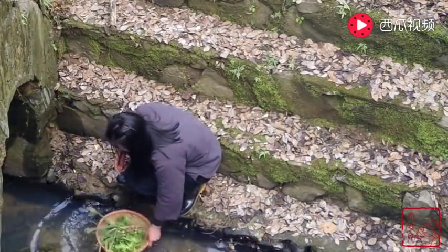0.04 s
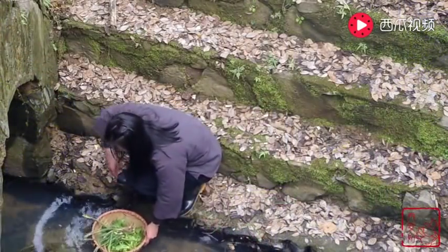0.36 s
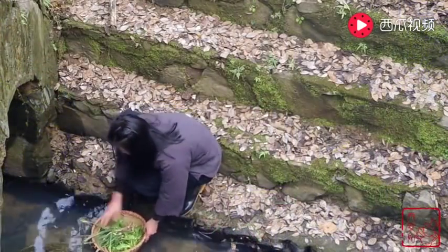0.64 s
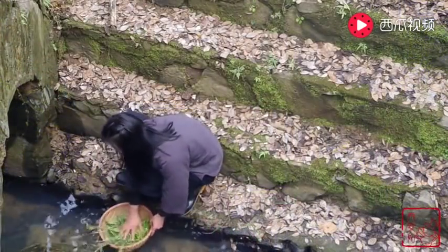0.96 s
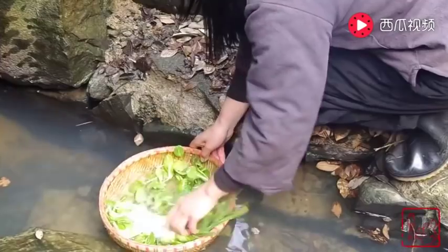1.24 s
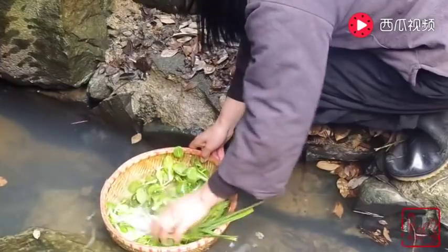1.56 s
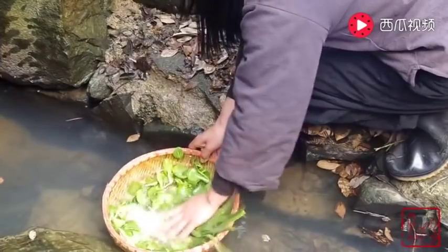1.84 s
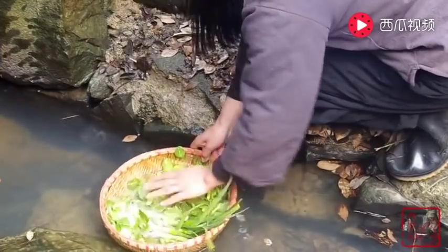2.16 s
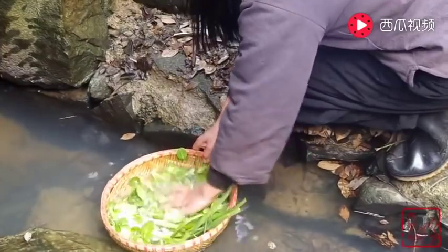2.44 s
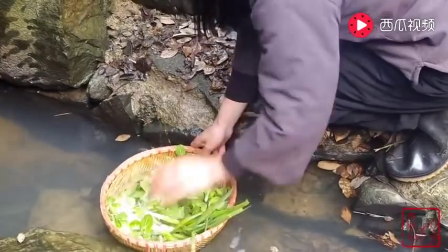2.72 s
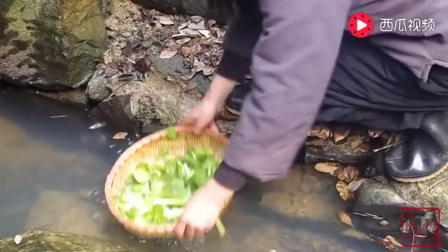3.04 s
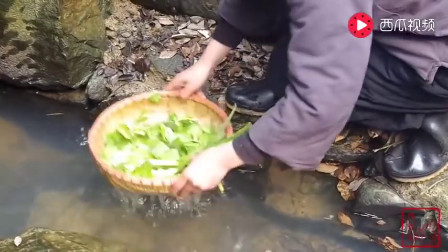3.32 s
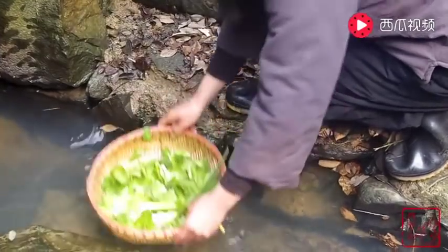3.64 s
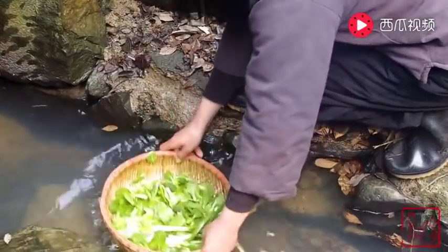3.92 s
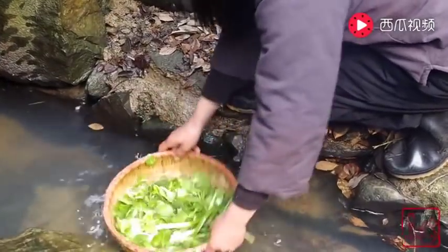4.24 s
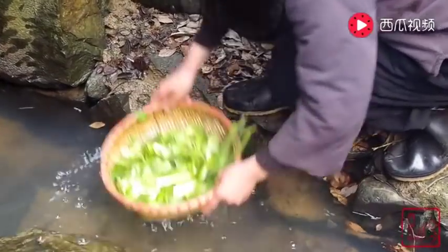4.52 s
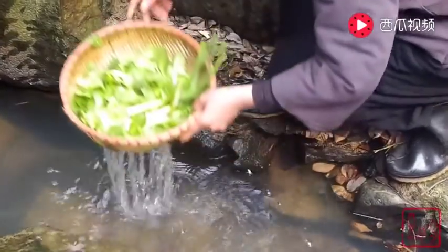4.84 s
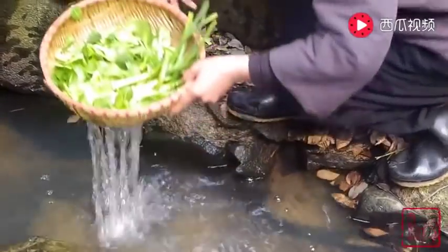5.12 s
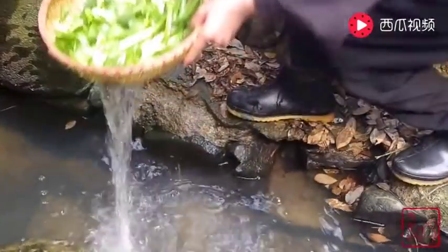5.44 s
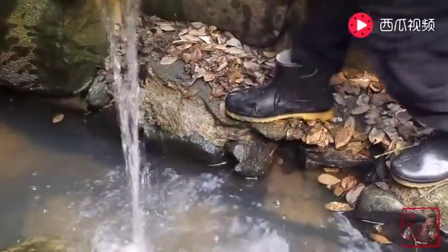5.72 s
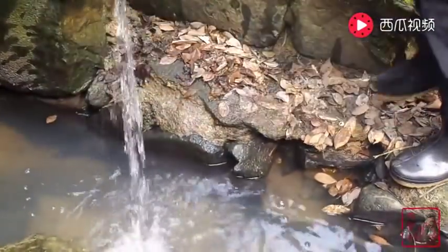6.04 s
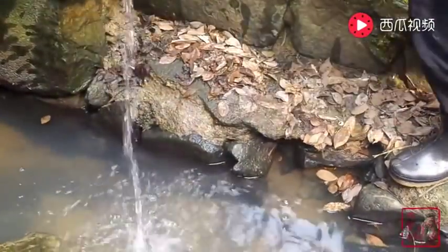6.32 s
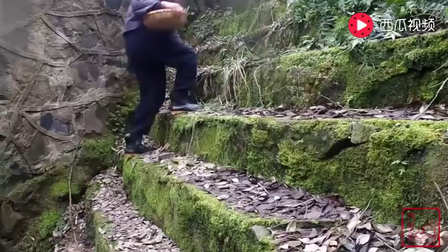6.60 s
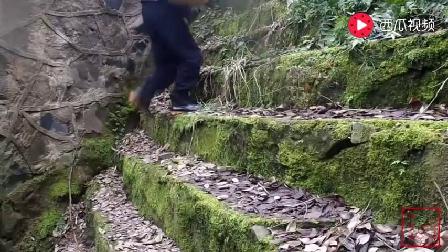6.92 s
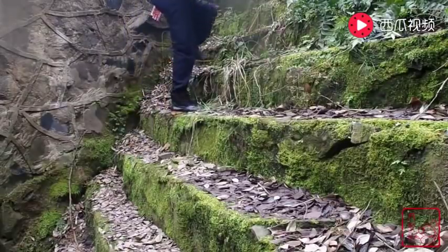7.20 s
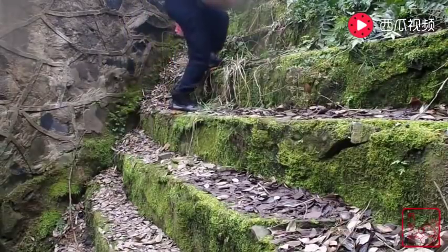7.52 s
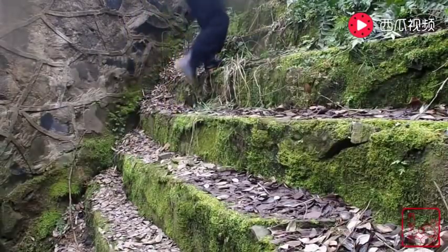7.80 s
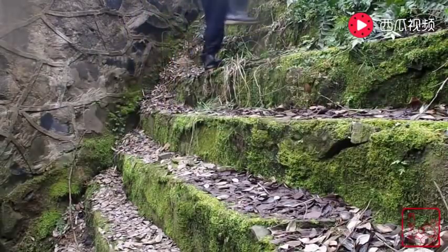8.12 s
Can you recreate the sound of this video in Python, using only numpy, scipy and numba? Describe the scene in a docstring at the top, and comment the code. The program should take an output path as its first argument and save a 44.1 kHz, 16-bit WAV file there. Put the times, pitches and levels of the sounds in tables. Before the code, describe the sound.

Greens are swished in a shallow stream and water pours from the lifted basket, followed by a few footsteps on leafy stone steps.

```python
"""In a shallow stream between stone walls, greens are swished in a basket that is dunked, lifted
and left to drain. Trapped air bubbles ring under a crackle of spray, with slaps, gurgles and drips.
We listen first from the bank, over a dull rumble, then close by, where the stream murmurs.
Then the scene jumps to boots thudding up stone steps, crushing dry leaves and cracking twigs.
The walls add a short echo, and a low hum runs throughout."""
import sys
import numpy as np
from scipy import signal
from scipy.io import wavfile
from scipy.ndimage import uniform_filter1d
from numba import njit

SR = 44100
rng = np.random.default_rng(int(sys.argv[2]) if len(sys.argv) > 2 else 0)


def unload_audio(sound):
    """Save the sound as a 16-bit wav file, at the path given as the first command line argument."""
    columns = np.transpose(np.atleast_2d(sound))
    # keep every value between -1 and 1, then stretch to whole-number steps
    steps = np.round(np.clip(columns, -1, 1) * 32767)
    wavfile.write(sys.argv[1], SR, steps.astype(np.int16))


N = 368676
T = np.arange(N) / SR
SLOW_T = T[::64]  # a coarser clock for slow changes
CLOSE_S, STEPS_S = 1.092, 6.595  # the listening place jumps to the water's edge, then the scene changes to the steps

# tone colour of spray: (frequency [Hz], level [dB])
SPRAY_COLOUR = [(150, -37.5), (500, -6), (1300, -7), (3200, -3.5), (6000, 1), (7500, 5), (8300, 1.5),
                (9300, 5), (9800, 0.5), (13500, 1), (16000, -11.5)]
# water pours through the lifted basket's mesh:
# (full flow from [s], until [s], relative bubbling [dB], relative spray [dB], deepest pitch [Hz])
POURS = [(3.596, 3.765, -26.5, -26, 330), (4.909, 6.6, -25.5, -27, 165.4)]


def amp(db):
    """Turns decibels into a gain."""
    return 10 ** (np.asarray(db) / 20)


def evened(x):
    """Scales a sound to an average level of 1."""
    return x / np.sqrt(np.mean(x ** 2) + 1e-20)


def steadied(x, span_s):
    """Holds the level near 1 over each span; quicker flicker is kept."""
    size = max(int(span_s * SR), 64)
    power = uniform_filter1d(uniform_filter1d(x ** 2, size), size)
    return x / np.sqrt(abs(power) + 1e-12)


def level_at(colour, hz):
    """Looks up a tone colour's level in dB at any frequency."""
    known_hz, db = np.transpose(colour)
    return np.interp(np.log(hz + 1), np.log(known_hz + 1), db)


def add(mix, start_s, sound):
    """Mixes a sound in at the given time."""
    part = mix[max(round(start_s * SR), 0):][:len(sound)]
    part += sound[:len(part)]


def coloured(x, colour, tilt_db=0):
    """Gives a sound a tone colour, tilted by tilt_db per octave above 500 Hz."""
    hz = abs(np.fft.fftfreq(4096, 1 / SR))
    log_gain = np.log(amp(level_at(colour, hz) + tilt_db * np.log2(np.maximum(hz, 500) / 500)))
    taps = np.fft.ifft(np.exp(signal.hilbert(log_gain).conj())).real  # keeps the front of a click sharp
    return signal.oaconvolve(x, taps[:len(hz) // 2])[:len(x)]


def noise(size, hz, kind="low"):
    """Noise below one frequency, or in a band between two."""
    return signal.sosfilt(signal.butter(2, hz, kind, fs=SR, output="sos"), rng.standard_normal(size))


def crackle(size, per_s, spread_db):
    """Random clicks, most of them small and a few large."""
    strength = rng.standard_normal(size) * amp(spread_db * np.minimum(rng.exponential(1, size), 4))
    return strength * (rng.random(size) < per_s / SR)


def burst(t, rise, fade):
    """Swells to 1 over the rise time, then dies away."""
    return np.minimum(t / rise, 1) * np.exp(-np.maximum(t - rise, 0) / fade)


def plateau(start, end, rise_db_per_s, fall_db_per_s):
    """A level in dB that climbs to 0 at the start, holds to the end, and falls."""
    return -rise_db_per_s * np.maximum(start - SLOW_T, 0) - fall_db_per_s * np.maximum(SLOW_T - end, 0)


@njit
def ring(starts, height, hz, cycles, climb):
    """Tones that fade to about a third in `cycles` swings; climb lifts the pitch, as in a rising bubble."""
    out = np.zeros(N)
    for k in range(len(starts)):
        start = max(int(starts[k] * SR), 0)
        for i in range(min(int(5 * cycles[k] * SR / hz[k]), N - start)):
            turns = i * hz[k] / SR
            age = turns / cycles[k]
            level = height[k] * np.exp(-age) * (1 - np.exp(-turns ** 2 / 2))
            out[start + i] += level * np.sin(2 * np.pi * turns * (1 + climb * age))
    return out


def background(hum_hz=60):
    """A dull rumble on the bank, then the stream's murmur, with a wavering hum under both."""
    # tone colours of the rumble and the stream: (frequency [Hz], level [dB])
    rumble_colour = [(25, -11), (55, 6.5), (110, -1), (270, -1), (360, -17.5), (1200, -18.5), (3500, -28.5),
                     (16000, -32.5)]
    stream_colour = [(20, 23.5), (58, 28), (110, 14.5), (550, 9.5), (700, 12.5), (1000, 8), (3500, 3.5),
                     (12000, 3), (16000, -1.5)]
    murmur = amp(-45) * evened(coloured(rng.standard_normal(N), stream_colour))
    rumble = amp(-38) * evened(coloured(rng.standard_normal(N), rumble_colour))
    waver = 0.63 * evened(noise(N, 7))
    hum = evened(np.sin(2 * np.pi * hum_hz * T + waver)) * amp(np.where(T < STEPS_S, -64, -54))
    return np.where(T < CLOSE_S, rumble, murmur) + hum


def far_swish():
    """A hand swishes in the water, heard from the bank as a soft wash."""
    # how the swishing swells and sinks: (time [s], level [dB])
    swells = [(0, -41), (.25, -46), (.3, -38.5), (.45, -48.5), (.9, -55.5), (1.09, -46)]
    # its tone colour: (frequency [Hz], level [dB])
    swish_colour = [(300, -5), (1400, -3), (3000, -10.5), (7000, -11.5), (11000, -23)]
    level = amp(np.interp(T, *np.transpose(swells))) * (T < CLOSE_S)
    return level * evened(coloured(rng.standard_normal(N), swish_colour))


def walls(x, echo_db, ring_s=0.21, treble_ring_s=0.079, patterns=5):
    """Stone walls scatter a short echo whose treble dies first; it shifts as the source moves about."""
    t, out = T[:SR // 2], x
    for k in range(patterns):
        bounces = rng.standard_normal(len(t)) * (rng.random(len(t)) < 3000 / SR) * (t > .004)
        low = signal.sosfilt(signal.butter(1, 4000, fs=SR, output="sos"), bounces)
        tail = low * amp(-60 * t / ring_s) + (bounces - low) * amp(-60 * t / treble_ring_s)
        share = np.sin(np.pi / 2 * np.minimum((T / .06 - k) % patterns, 2))  # the patterns take turns
        out = out + amp(echo_db) * signal.oaconvolve(x * share, tail / np.linalg.norm(tail))[:N]
    return out


def slaps():
    """A hand, the basket or a falling clump of water slaps the surface."""
    # hits on the water: (time [s], level [dB], fading time [s])
    hits = [(0.025, -31.5, 0.0026), (0.373, -36.5, .012), (1.085, -32, 0.0071), (1.332, -37.5, 0.033),
            (2.28, -28, 0.034), (2.982, -33.5, 0.015), (4.304, -31, 0.009), (4.734, -24, 0.007),
            (4.926, -18.5, 0.013), (5.240, -20, 0.025), (5.577, -23, 0.011), (5.990, -21.5, 0.018),
            (6.135, -24.5, 0.078), (6.283, -17.5, 0.0064), (6.422, -14, 0.0018), (6.435, -16, 0.0066),
            (6.531, -21, 0.044)]
    t, out = T[:SR // 5], np.zeros(N)
    for start, db, fade in hits:
        splash = evened(coloured(rng.standard_normal(len(t)), SPRAY_COLOUR))
        add(out, start, amp(db) * burst(t, .001, fade) * splash)
    return out


def gurgles(width_hz=175, fade_db_per_s=31):
    """Churning water sounds through a hollow whose pitch slides."""
    # soft gurgles: (time [s], length [s], first pitch [Hz], last pitch [Hz], level [dB])
    glides = [(0.101, 0.057, 905, 1904, -38), (0.329, 0.59, 1153, 1058, -38.5),
              (1.662, .06, 1120, 1020, -46), (2.801, 0.084, 1100, 1250, -49.5),
              (3.45, .13, 1650, 1350, -35), (3.584, .14, 548, 320, -35.5), (6.295, 0.043, 900, 978, -29.5)]
    out = np.zeros(N)
    for start, length, first_hz, last_hz, db in glides:
        size = int(length * SR)
        churn = noise((2, size), width_hz / 2)
        phase = 2 * np.pi * np.cumsum(np.geomspace(first_hz, last_hz, size)) / SR
        tone = churn[0] * np.cos(phase) - churn[1] * np.sin(phase)  # noise centred on the sliding pitch
        level = amp(db - fade_db_per_s * T[:size]) * signal.windows.tukey(size, .1)
        add(out, start, level * steadied(tone, 0.05))
    return out


def stroke(start, hold, bubbling_db, spray_db, largest_hz=565):
    """A push churns the water at once, and it settles slowly."""
    push_db = plateau(start, start + hold, rise_db_per_s=370, fall_db_per_s=87)
    return bubbling_db + push_db, spray_db + push_db, np.full(len(SLOW_T), largest_hz)


def churning(trickle_db=-63):
    """Strokes and pours together set the bubbling, the spray and the pitch of the largest bubbles."""
    # the hand, the basket or a gush pushes into the water:
    # (time [s], hold [s], relative bubbling [dB], relative spray [dB])
    pushes = [(1.096, 0.044, -39, -38), (1.932, 0.033, -35.5, -40.5), (2.075, 0.033, -43, -49),
              (2.298, 0.084, -36.5, -38.5), (2.524, 0.026, -36, -36.5), (3.035, 0.04, -48, -62),
              (3.375, .12, -43.5, -46), (3.898, 0.018, -36.5, -40.5), (4, 0.2, -45, -50),
              (5.26, 0.16, -27, -32.5), (5.964, 0.033, -26.5, -29.5), (6.243, .08, -30, -26.5)]
    events = [stroke(*row) for row in pushes] + [pour(*row) for row in POURS]
    each_bubbling, each_spray, each_hz = np.stack(events, 1)
    trickle = amp(trickle_db) * (SLOW_T > CLOSE_S)  # the wet basket sprays a little between strokes
    bubbling_db = 10 * np.log10((amp(each_bubbling) ** 2).sum(0))
    spray_db = 10 * np.log10((amp(each_spray) ** 2).sum(0) + trickle ** 2)
    heard = each_bubbling >= each_bubbling.max(0) - 12  # within 12 dB of the loudest
    largest_hz = np.where(heard, each_hz, np.inf).min(0)
    return [np.interp(T, SLOW_T, curve) for curve in (bubbling_db, spray_db, largest_hz)]


def clumps(per_s, fade_s):
    """A ragged level: water lands in clumps, each sudden and quickly fading."""
    landings = rng.exponential(1, N) * (rng.random(N) < per_s / SR)
    return np.sqrt(signal.lfilter([1], [1, -np.exp(-1 / (fade_s * SR))], landings) + 0.24)


def bubble_swarm(bubbling_db, largest_hz, surge, tries=38000, spread_db=4.0, typical_cycles=3.76):
    """Trapped air rings: harder churning makes more bubbles, and deeper plunges larger ones."""
    # tone colour of the swarm: (frequency [Hz], level [dB])
    bubble_colour = [(200, -3), (400, -5.5), (800, -1.5), (1600, 8), (3200, 3.5), (4500, -2), (8000, -8.5)]
    when, pitch, size, ringing, luck = rng.random((tries, 5)).T
    starts = CLOSE_S + when * (STEPS_S - CLOSE_S)
    hz = 145 * 52 ** (pitch ** .75)
    bigness = np.interp(starts, T, largest_hz) / hz
    chance = amp(.3 * (np.interp(starts, T, bubbling_db) + 26))
    born = (luck < chance) & (bigness < 2)
    # the largest bubbles glug loudest; oversized ones are nearly silent
    size_gain = (1 + np.minimum(bigness, 1) ** 2) / np.sqrt(1 + bigness ** 20)
    height = amp(level_at(bubble_colour, hz) - spread_db * np.log(size + .02)) * size_gain
    height *= (hz / 1000) ** .8  # small bubbles die sooner, so they start stronger
    height *= np.interp(starts, T, surge)
    cycles = typical_cycles * 2 ** (2 * ringing - 1)
    swarm = ring(starts[born], height[born], hz[born], cycles[born], climb=0.024)
    return amp(bubbling_db - 2.5) * steadied(swarm, 0.073)


def spray(spray_db, surge):
    """Coarse spray lands with the clumps that trap bubbles; finer, brighter spray falls in its own time."""
    out = np.zeros(N)
    for level, tilt_db in (surge, -2), (clumps(per_s=170, fade_s=.005), 3):
        clicks = crackle(N, per_s=12000, spread_db=2.2)
        out += level * evened(coloured(clicks, SPRAY_COLOUR, tilt_db))
    return amp(spray_db - 0.8) * steadied(out, 0.63)


def plops(tinkle_hz=3000):
    """Single large drops and gulps: gentle ones ring longest, tiny ones tinkle."""
    # large drops: (time [s], level [dB], pitch [Hz])
    drops = [(1.097, -26, 1326), (1.138, -21, 3240), (1.207, -22.5, 1690), (1.217, -21.5, 1434),
             (1.958, -24, 2780), (1.959, -26, 1390), (2.133, -20.5, 2510), (2.401, -21, 1250),
             (2.452, -28, 512), (2.504, -20.5, 1476), (2.532, -9.5, 3040), (3.333, -25, 2040),
             (3.373, -27, 7320), (3.390, -26, 5770), (3.430, -22.5, 6700), (3.463, -22, 5730),
             (3.500, -17, 1850), (3.515, -20, 8900), (3.665, -11, 6900), (3.725, -4.5, 870),
             (3.747, -7, 1115), (3.913, -18.5, 4500), (4.112, -30, 1510), (4.306, -14.5, 2660),
             (4.499, -31, 1920), (4.670, -28, 2950), (4.723, -28, 3700), (4.735, -27, 1520),
             (4.829, -13, 2890), (4.870, -26, 720), (4.876, -19, 1507), (4.910, -12, 5850),
             (4.911, -22, 517), (4.918, -13, 1370), (5.263, -17, 485), (5.426, -23, 265),
             (5.657, -13, 1630), (5.743, -8, 3440), (5.748, -10.5, 1560), (5.800, -30.5, 195),
             (6.070, -6, 2260), (6.097, -23, 330), (6.138, -21.5, 401), (6.270, -24, 453),
             (6.481, -9.5, 1306), (6.566, -18, 882), (6.584, -4, 1586), (6.585, -6.5, 2360)]
    starts, db, hz = np.array(drops, float).T.copy()
    cycles = 3.7 * amp(-0.22 * db) * np.maximum(hz / tinkle_hz, 1)
    return ring(starts, amp(db), hz, cycles, climb=0.0061)


def droplets(spray_db, count, cap_db, floor_db=-55, spread_db=4.5):
    """Random times, levels and pitch choices (0 to 1) for droplets: most are small, a few much louder."""
    when, pitch, size = rng.random((count, 3)).T
    starts = CLOSE_S + when * (STEPS_S - CLOSE_S)
    flow_db = np.clip(np.interp(starts, T, spray_db), floor_db, cap_db)  # wet greens never stop dripping
    return starts, flow_db - spread_db * np.log(size + .04), pitch


def drips(spray_db):
    """Droplets fall from the mesh and tinkle; a heavy flow covers them."""
    starts, db, pitch = droplets(spray_db, count=520, cap_db=-37)
    hz = 1800 * 4.5 ** pitch
    return ring(starts, amp(db + 2.5), hz, cycles=8 * np.sqrt(hz / hz.min()), climb=.01)


def spatter(spray_db, lowest_hz=5400):
    """The finest droplets land with short bright ticks."""
    starts, db, pitch = droplets(spray_db, count=420, cap_db=-41)
    return ring(starts, amp(db + 5), lowest_hz * (1 + pitch), cycles=np.full(len(db), 6.), climb=0.)


def pour(start, end, bubbling_db, spray_db, deepest_hz, first_hz=475, deepen_s=0.174, thin_s=1.7):
    """As the basket rises, water falls further and traps larger bubbles, until the flow runs thin."""
    flow_db = plateau(start, end, rise_db_per_s=96, fall_db_per_s=165)
    flow_db -= 2.5 * (SLOW_T > 6.35)  # the wash drops as the flow at last breaks into clumps
    age = np.clip(SLOW_T - start, -.25, end - start)
    largest_hz = deepest_hz + (first_hz - deepest_hz) * np.exp(-age / deepen_s)
    largest_hz *= 1 + (age / thin_s) ** 4
    thinning_db = 1.15 * age  # a thinner flow bubbles less
    return bubbling_db + flow_db - thinning_db, spray_db + flow_db, largest_hz


def glugs(bubbling_db, largest_hz, tries=36):
    """Now and then the pouring water traps a big pocket of air, close to the largest size."""
    when, pitch, size = rng.random((tries, 3)).T
    starts = CLOSE_S + (np.arange(tries) + when) / tries * (STEPS_S - CLOSE_S)
    pouring = sum((starts > first) & (starts < last) for first, last, *_ in POURS)
    height = pouring * amp(np.interp(starts, T, bubbling_db) - 2 - 6 * size)
    hz = np.interp(starts, T, largest_hz) * 1.566 * 2 ** (pitch - .5)
    return ring(starts, height, hz, cycles=np.full(tries, 4.), climb=0.022)


def dunk(start_s=3.74, db=-20.5, band_hz=(190, 2000)):
    """The basket drops back: its flat bottom shoves the water aside with a dull whump."""
    t, out = T[:SR // 2], np.zeros(N)
    shove = evened(noise(len(t), band_hz, "band"))
    add(out, start_s, amp(db) * burst(t, rise=0.0069, fade=0.021) * shove)
    return out


def footsteps(sole_hz=(172, 335), ground_hz=110):
    """Each boot lands with a dull thud and crushes dry leaves in a rush of tiny snaps."""
    # soles land on stone: (time [s], level [dB], fading time [s])
    thuds = [(6.629, -20.5, 0.0095), (6.66, -26, 0.016), (7.425, -25, 0.0082), (7.437, -36, 0.009)]
    # leaves crush: (time [s], level [dB], rise time [s], fading time [s], tilt [dB per octave])
    crunches = [(6.61, -27.5, 0.054, 0.03, 3), (6.739, -40.5, 0.11, 0.06, 0.5),
                (7.409, -34, 0.003, 0.087, -0.5), (7.439, -27.5, 0.003, 0.016, 1.5),
                (7.585, -39, 0.0016, 0.041, -1), (7.627, -30, .002, 0.02, 0),
                (7.672, -26.5, 0.0008, 0.011, -1), (7.691, -42, 0.025, 0.2, -1),
                (8.049, -28.5, 0.001, 0.02, 1)]
    # tone colour of dry leaves: (frequency [Hz], level [dB])
    leaf_colour = [(80, -2), (400, 6.5), (1000, 4), (1600, 6.5), (2300, 1.5), (12500, 4.5), (16000, -5.5)]
    t, out = T[:SR // 2], np.zeros(N)
    for start, db, fade in thuds:
        sole = steadied(noise(len(t), sole_hz, "band"), 0.018)
        add(out, start, amp(db) * burst(t, 0.00074, fade) * sole)
    ground = steadied(noise(len(t), ground_hz), .05)  # the nearest step also shakes the ground
    add(out, thuds[0][0], amp(-36) * burst(t, rise=0.026, fade=0.075) * ground)
    for start, db, rise, fade, tilt_db in crunches:
        snaps = coloured(crackle(len(t), per_s=3600, spread_db=1.0), leaf_colour, tilt_db)
        add(out, start, amp(db) * burst(t, rise, fade) * steadied(snaps, 0.021))
    return out


def twigs(ring_s=0.0029):
    """Dry twigs crack under a boot and ring for an instant."""
    # cracks: (time [s], level [dB], pitch [Hz])
    cracks = [(7.441, -18.5, 3100), (7.445, -17, 4160), (7.449, -18.5, 1640), (7.586, -23, 1710)]
    starts, db, hz = np.array(cracks, float).T.copy()
    return ring(starts, amp(db), hz, cycles=ring_s * hz, climb=0.)


def scene():
    """The washing, then the boots, both echoing off stone over the background."""
    bubbling_db, spray_db, largest_hz = churning()
    surge = clumps(per_s=130, fade_s=.008)
    water = spray(spray_db, surge) + bubble_swarm(bubbling_db, largest_hz, surge)
    water += slaps() + far_swish() + plops() + drips(spray_db) + spatter(spray_db)
    water += glugs(bubbling_db, largest_hz) + gurgles() + dunk()
    by_the_water = np.clip((STEPS_S - T) / .002, 0, 1)
    washing = walls(water, echo_db=-8) * by_the_water
    boots = walls(footsteps() + twigs(), echo_db=-6)
    return (washing + boots + background())[None]


def record(dry, top_hz=15900):
    """Cuts off the very highest treble."""
    return signal.oaconvolve(dry, signal.firwin(511, top_hz, window=("kaiser", 9), fs=SR)[None], "same")


dry = scene()
out = record(dry)
unload_audio(out)
```